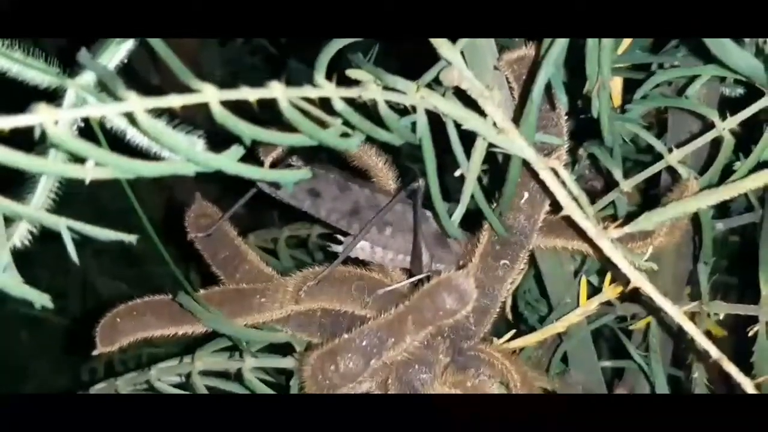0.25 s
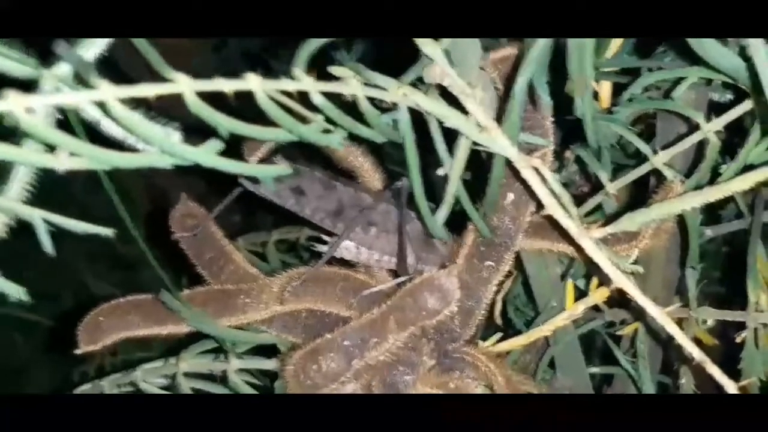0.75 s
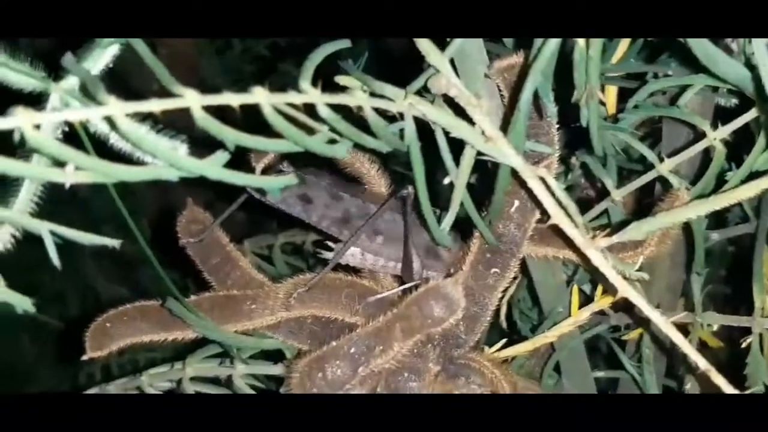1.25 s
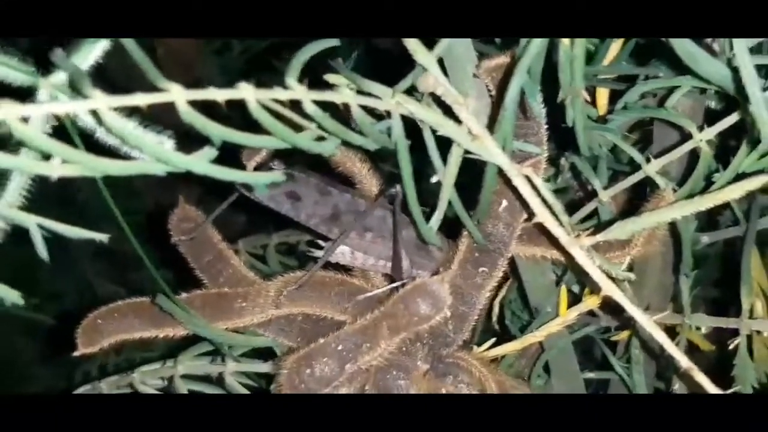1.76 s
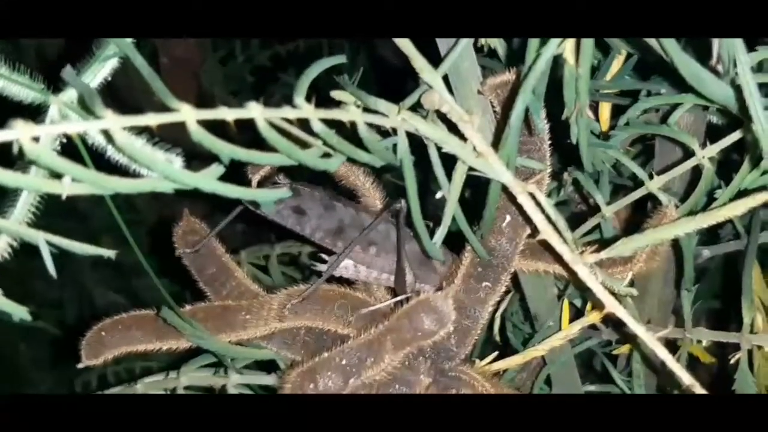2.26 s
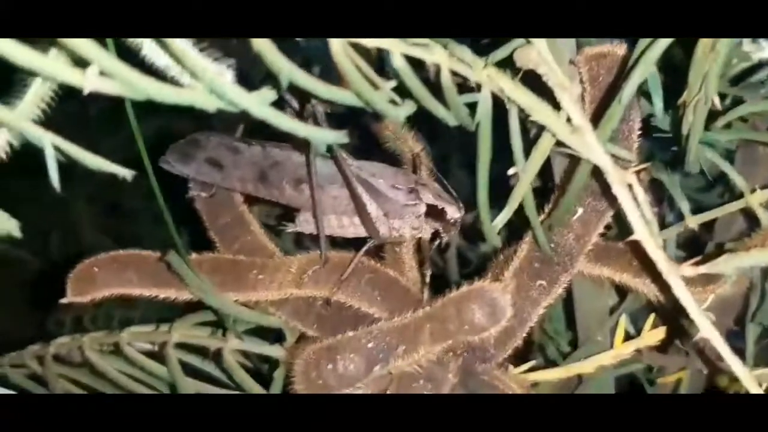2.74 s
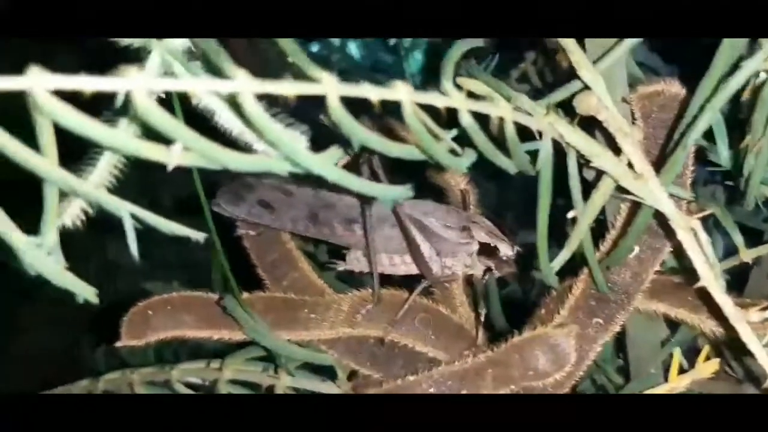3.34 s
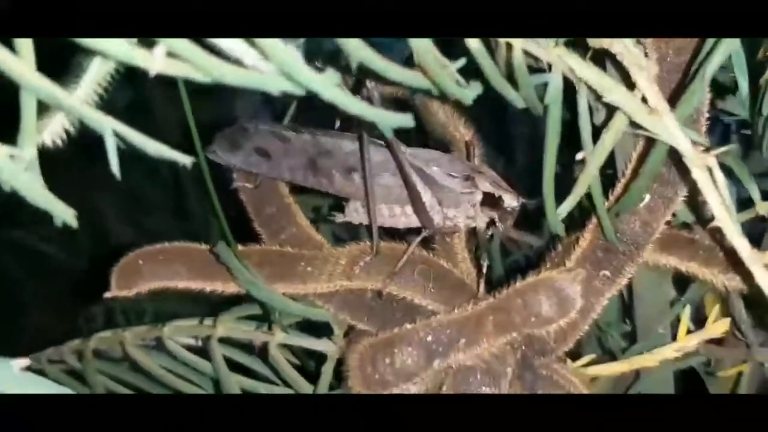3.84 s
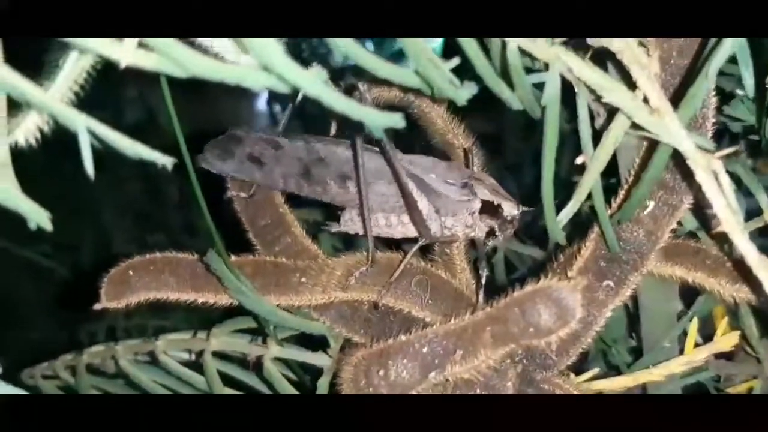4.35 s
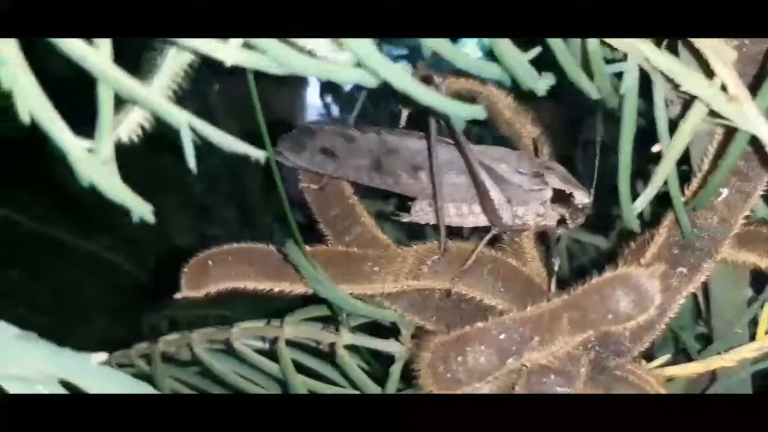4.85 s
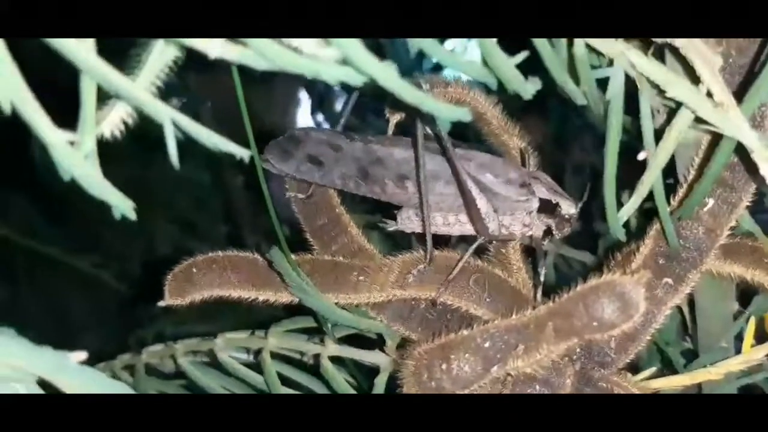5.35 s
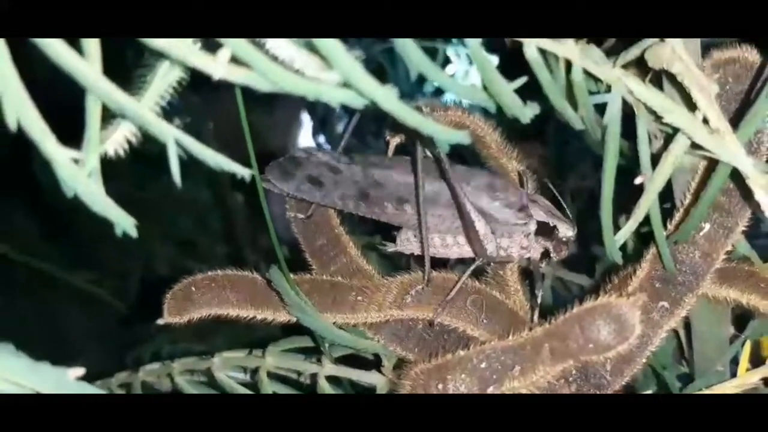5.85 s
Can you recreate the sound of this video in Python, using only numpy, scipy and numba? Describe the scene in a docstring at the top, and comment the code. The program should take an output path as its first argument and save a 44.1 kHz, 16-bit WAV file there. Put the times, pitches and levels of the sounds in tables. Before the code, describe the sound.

A close katydid rasps out loud, rapid chirps at night, stops briefly, then resumes weakly, over steady insect hiss and distant cricket trills.

```python
"""Night in the bushes: a steady hiss with crickets trilling further off, as noise and gliding sine notes.
Almost at once a katydid, close and slightly left of the phone's two microphones, calls some eight times a second;
each chirp, a soft opening and a loud closing stroke, drags a toothed file over a scraper and rings the wings.
Its strokes overload the microphones into a low thud; two more call from behind bushes; wing and foliage snap.
It pauses after 2.5 s, then resumes weakly with a slower tooth rate and hesitates twice before the end."""
import sys
import numpy as np
from scipy import signal
from scipy.fft import rfft, irfft
from scipy.io import wavfile
from numba import njit

SR = 44100
rng = np.random.default_rng(int(sys.argv[2]) if len(sys.argv) > 2 else 0)


def int16_out(signal):
    """Quantize to a 16-bit WAV file."""
    q = np.round(np.clip(np.atleast_2d(signal).T, -1, 1) * 32767)
    wavfile.write(sys.argv[1], SR, q.astype(np.int16))


N = 268965
TIME = np.arange(N) / SR
FREQ = np.fft.rfftfreq(N, 1 / SR)

# colour of the night air: [f/Hz, relative density level/dB]
NIGHT_COLOUR = [(30, -12), (190, -5.5), (450, -13.5), (1000, -18), (1950, -24), (2480, -8), (3000, -8),
                (3600, -10.5), (4150, -18), (5200, -11.5), (7700, -3), (9400, -13.5), (12300, -3.5),
                (15500, -12.5)]
# night hiss at the microphones; insects follow it: [t/s, level/dB before flicker]
NIGHT_LEVEL = [(0, -53), (2.4, -50.5), (2.7, -51), (4.3, -47), (5, -51), (6.1, -48.5)]
# bands of the farthest insects: [f/Hz, width/Hz of each of three passes, level/dB over the hiss]
CHORUS_BANDS = [(2547, 540, -11.5), (3600, 500, -10.5)]
# crickets further off: [first note t/s, notes per s, starting f/Hz, level/dB over the hiss before swell]
CRICKETS = [(.002, 16, 5760, -1.5), (0.041, 15, 4960, -10.5)]

# runs of close chirps; one long chirp ends the first bout, and the first after a hesitation is weaker:
# [start t/s, end t/s, period/s, first chirp's effort level/dB, first chirp's length/s]
RUNS = [(.0178, 2.42, .1179, 0, .031), (2.492, 2.55, .118, -.3, .04), (3.0035, 3.78, .1187, -7.5, .03),
        (3.851, 4.04, .126, -.7, .031), (4.0995, 5.57, .1172, 0, .03), (5.64, 6.05, .1171, -5, .015)]
CHIRP_S = .031  # every chirp but the first of a run
EFFORT_SCATTER_DB = .5
# teeth struck, slower after the pause: [t/s, tooth rate f/Hz]
TOOTH_RATE = [(2.4, 2621), (3.0, 2538), (6.0, 2556)]
# one wing cycle: [time as share of chirp length, force level/dB, tooth rate as multiple of the chirp's]
WING_CYCLE = [(0, -27, .88), (.09, -10, .91), (.22, -6, .98), (.35, -5, 1.05), (.39, -15, 1.0),
              (.49, -15, .92), (.58, -6, .95), (.8, 2, 1.0), (1.0, -3, 1.05), (1.06, -13, 1.02),
              (1.26, -14, 1.02), (1.38, -26, 1.0), (1.8, -46, 1.0)]
# wing resonances, low, main and treble, each rung in two passes of twice the listed width:
# [f as multiple of tooth rate, width/Hz, relative level/dB, phase lead at the left microphone/rad]
LOW_MODES = [(1.022, 700, 13.5, 2.26), (1.269, 464, -2.5, 3.13)]
MAIN_MODES = [(2.782, 687, -5.5, 3.92), (3.038, 850, 0, 5.08), (3.948, 1327, -11, 8.6)]
TREBLE_MODES = [(5.3, 1700, -2, 7.6), (5.85, 1500, 0, 7.7)]
# close song at the phone, at zero effort and before leaf tails:
# [t/s, main level/dB, low level/dB, treble level/dB, left minus right level/dB]
SONG_PLACE = [(0, -16, -26, -22, .9), (2.4, -15, -27, -22, 1.6), (3.1, -12, -24, -22, 1.5),
              (4.4, -15, -21.5, -22.5, 2.5), (6.0, -19.5, -22.5, -20.5, 2.5)]
# overload of the microphones at zero effort: [t/s, thud level/dB, swing level/dB]
OVERLOAD_LEVEL = [(0, -15.5, -26), (2.2, -15.5, -23.5), (2.55, -21.5, -44), (3.2, -21, -33),
                  (4.4, -23, -38.5), (5.2, -21.5, -34), (6.0, -29.5, -44)]
THUD_SLOPE, SWING_SLOPE = 4.2, 8.2  # dB per dB of effort: faster than the song
# colour of the thud, before a low-pass: [f/Hz, width/Hz, relative level/dB]
THUD_MODES = [(184, 90, -8.5), (330, 188, 0.5), (554, 300, -5.5), (762, 81, -3.5), (1635, 420, -11.5)]
# slow swing of the recovering microphones, before a further resonance: [f/Hz, width/Hz, relative level/dB]
SWING_MODES = [(62, 29, -4.5), (114.9, 49, -3.5)]
# dry snaps of wing and foliage: [t/s, level/dB at the peak of the envelope]
SNAPS = [(.355, -57.5), (0.471, -50), (1.504, -32), (2.615, -39.5), (3.704, -50), (4.462, -9.5)]
TOP_HZ = 15700  # upper edge of the phone's pass band


def undb(db):
    """Decibels to gain."""
    return 10 ** (np.asarray(db) / 20)


def unit(x):
    """Scale to rms 1."""
    return x / np.sqrt(np.mean(x ** 2))


def read(rows, times=TIME):
    """Join (t, value, ..) rows by straight lines; one curve for each column."""
    at, *columns = np.transpose(rows)
    return np.array([np.interp(times, at, column) for column in columns])


def walk(rate):
    """Random levels, rate a second, joined by straight lines."""
    return np.interp(TIME * rate, np.arange(N // 20), rng.standard_normal(N // 20))


def shape(x, response):
    """Filter by a frequency response."""
    return irfft(rfft(x) * response, N)


def resonance(hz, width_hz):
    """Response of one resonance, gain 1 at its centre."""
    return 1j * FREQ * width_hz / (hz ** 2 - FREQ ** 2 + 1j * FREQ * width_hz)


def resonances(modes):
    """Summed response of (f, width, level) resonances."""
    return sum(undb(db) * resonance(hz, width_hz) for hz, width_hz, db in modes)


def lowpass(hz, order):
    """Response of a smooth low-pass."""
    return signal.freqs(*signal.butter(order, 1, analog=True), FREQ / hz)[1]


def leaves(x, t60, db, size=4096):
    """Twigs and leaves scatter a short tail, different at each microphone and changing as the phone sways."""
    out = np.zeros((2, N + 2 * size))
    fade = undb(-60 * TIME[:size] / t60)
    fade /= np.sqrt(np.sum(fade ** 2))
    window = np.sqrt(np.hanning(size))
    # half-overlapping pieces, each with a newly drawn tail
    for i in range(0, N, size // 2):
        piece = x[i:i + size] * window[:N - i]
        tail = rng.standard_normal((2, size)) * fade
        wet = signal.fftconvolve(piece[None], tail, axes=1)
        out[:, i:i + wet.shape[1]] += wet
    return undb(db) * out[:, :N]


def night(flicker_db=.5):
    """A softly flickering hiss of air and countless insects; its bass is more alike on both sides."""
    hz, db = np.transpose(NIGHT_COLOUR)
    colour = undb(np.interp(np.log(FREQ + 1), np.log(hz), db))
    mid, side = shape(rng.standard_normal((2, N)), colour)
    side = shape(side, np.interp(FREQ, [300, 1500, 8000], [.5, 1, .75]))
    hiss = unit(np.array([mid + side, mid - side]))
    return hiss * undb(flicker_db * walk(20))


def shimmer(flicker_db=4, flickers_per_s=70):
    """The farthest insects blur into narrow noise bands that flicker each on its own."""
    out = 0
    for hz, width_hz, db in CHORUS_BANDS:
        flickering = rng.standard_normal((2, N)) * undb(flicker_db * walk(flickers_per_s))
        out = out + undb(db) * unit(shape(flickering, resonance(hz, width_hz) ** 3))
    return out


def cricket(first, rate_hz, hz, db, length=.042, sag=.1, scatter_db=1.6, waver_db=2.5):
    """A trill of nearly pure notes, each swelling, dipping and returning as its pitch sags."""
    out = np.zeros(N + SR)
    age = np.arange(int(length * SR)) / int(length * SR)  # share of the note
    swell = np.interp(age, [0, .27, .55, 1], [0.54, 0.94, 0.0, 0.63])
    glide = 1 - sag * age ** 1.4
    starts = np.arange(first, N / SR, 1 / rate_hz)
    for start, (late, pitch, loud) in zip(starts, rng.standard_normal((200, 3))):
        i = int(abs(start + .003 * late) * SR)
        turns = np.cumsum(hz * (1 + .008 * pitch) * glide) / SR
        note = np.sqrt(2) * swell * np.sin(2 * np.pi * turns)
        out[i:i + len(age)] += undb(db + scatter_db * loud) * note
    trill = out[:N] * undb(waver_db * walk(2))
    return trill + leaves(trill, t60=.03, db=-3)


def chirps():
    """Start, length, tooth rate and effort of every close chirp in the runs."""
    rows = []
    for start, end, period, first_db, first_s in RUNS:
        for t in np.arange(start, end, period):
            rows.append((t, first_s, first_db) if t == start else (t, CHIRP_S, 0))
    starts, lengths, effort_db = np.transpose(rows)
    effort_db = effort_db + EFFORT_SCATTER_DB * rng.standard_normal(len(starts))
    return starts, lengths, read(TOOTH_RATE, starts)[0], effort_db


def strokes(starts, lengths, rates_hz):
    """Force on the file and tooth rate through a train of wing cycles."""
    which = np.clip(np.searchsorted(starts, TIME) - 1, 0, len(starts) - 1)
    age = (TIME - starts[which]) / lengths[which]
    share, force_db, speed = np.transpose(WING_CYCLE)
    force = undb(np.interp(age, share, force_db)) * (age > 0) * (age < share[-1])
    return force, rates_hz[which] * np.interp(age, share, speed)


def teeth(force, rate_hz, jitter, uneven_db):
    """One click for each tooth that slips past the scraper, uneven in spacing and size."""
    turns = np.cumsum(rate_hz) / SR
    count = np.arange(int(turns[-1]))
    chance = rng.standard_normal((N // 8, 2))[:len(count)]
    # spacing errors add up from tooth to tooth
    at = np.interp(count + jitter * np.cumsum(chance[:, 0]), turns, np.arange(N))
    size = force[at.astype(int)] * undb(uneven_db * chance[:, 1])
    # windowed sinc clicks fall between samples
    taps = at.astype(int)[:, None] + np.arange(-7, 9)
    offset = taps - at[:, None]
    clicks = size[:, None] * np.sinc(offset) * np.sinc(offset / 8)
    return np.bincount(np.clip(taps, 0, N - 1).ravel(), clicks.ravel(), N)


@njit
def resonate(x, hz, width_hz):
    """State-variable band-pass whose centre may move every sample."""
    y, band, low = np.empty(len(x)), 0., 0.
    for i in range(len(x)):
        g, k = np.tan(np.pi * min(hz[i] / SR, .45)), width_hz / hz[i]
        v = (band + g * (x[i] - low)) / (1 + g * (g + k))
        band, low, y[i] = 2 * v - band, low + 2 * g * v, k * v
    return y


def ring(x, rate_hz, modes):
    """Wing resonances follow the tooth rate; each reaches the two microphones with its own phase."""
    out = 0
    for multiple, width_hz, db, lead in modes:
        once = resonate(x, multiple * rate_hz, 2. * width_hz)
        mode = undb(db) * resonate(once, multiple * rate_hz, 2. * width_hz)
        out = out + np.array([mode, shape(mode, np.exp(-1j * lead))])
    return out


def each_at(x, starts, lengths, levels_db):
    """Give every chirp in x its own level, its energy taken as rms over its length."""
    which = np.clip(np.searchsorted(starts - .005, TIME) - 1, 0, len(starts) - 1)
    power = np.bincount(which, np.mean(np.atleast_2d(x) ** 2, axis=0)) / (lengths * SR)
    return x * (undb(levels_db) / np.sqrt(power + 1e-18))[which]


def katydid(starts, lengths, rates_hz, effort_db, rasp_db=-13, crackle_db=-7, near_db=-7, far_db=-34, grit=0.48):
    """Tooth clicks ring the wings, whose main resonance lies near the third multiple of the tooth rate."""
    main_db, low_db, treble_db = read(SONG_PLACE, starts)[:3] + effort_db
    thud_db = read(OVERLOAD_LEVEL, starts)[0] + THUD_SLOPE * effort_db
    force, rate_hz = strokes(starts, lengths, rates_hz)
    # the scraper catches and skips, so no two strokes are alike
    force = force * undb(2 * walk(600))
    rate_hz = rate_hz * np.exp(.018 * walk(500))
    clicks = teeth(force, rate_hz, jitter=.066, uneven_db=3.5)

    # a harder stroke is brighter: the low resonance saturates first
    scrape = clicks + grit * force * rng.standard_normal(N)
    low = ring(scrape / (force + 0.25) ** 0.33, rate_hz, LOW_MODES)
    main = ring(clicks, rate_hz, MAIN_MODES)
    treble = ring(clicks * force ** .15, rate_hz, TREBLE_MODES)
    song = (each_at(low, starts, lengths, low_db)
            + each_at(main, starts, lengths, main_db)
            + each_at(treble, starts, lengths, treble_db))

    # the scraper also grates without a pitch; the overloaded microphones add a broad crackle
    grating = shape(rng.standard_normal((2, N)) * force ** .75, resonance(10500, 8000) ** 3)
    crackle_colour = lowpass(9000, order=1) * (1 - .95 * resonance(4600, 2600))
    crackle = shape(rng.standard_normal((2, N)) * force ** 1.5, crackle_colour)
    rasp = (each_at(grating, starts, lengths, main_db + rasp_db)
            + each_at(crackle, starts, lengths, thud_db + crackle_db))
    near = leaves(song[0], t60=.012, db=near_db)
    far = leaves(song[0], t60=0.088, db=far_db)
    return song + rasp + near + far


def overload(starts, lengths, rates_hz, effort_db, steepness=2.9, shared=0.98, lag_s=0.0017):
    """The song's ultrasound beats in the overloaded microphones: a rough thud, then a slow recovery swing."""
    slopes = [THUD_SLOPE, SWING_SLOPE]
    thud_db, swing_db = read(OVERLOAD_LEVEL, starts) + np.outer(slopes, effort_db)
    force = strokes(starts + lag_s, lengths, rates_hz)[0]
    drive = force ** steepness * undb(3.0 * walk(400))
    # noise of each microphone plus noise common to both
    beats = drive * (rng.standard_normal((2, N)) + shared * rng.standard_normal(N))
    thud = shape(beats, resonances(THUD_MODES) * lowpass(940, order=2))
    # the deepest part of the swing comes last
    push = drive + 3 * beats
    swing = shape(push, resonances(SWING_MODES) * resonance(99.6, 89) ** 2)
    return each_at(thud, starts, lengths, thud_db) + each_at(swing, starts, lengths, swing_db)


def far_katydid(first, rate_hz, tooth_hz, low_db, db):
    """Another katydid, only its scattered tail arriving through the bushes in between."""
    starts = first + (np.arange(64) + .03 * rng.standard_normal(64)) / rate_hz
    lengths, rates_hz = np.full(len(starts), .032), np.full(len(starts), tooth_hz)
    force, speed = strokes(starts, lengths, rates_hz)
    clicks = teeth(force, speed, jitter=.04, uneven_db=3)
    song = ring(clicks, speed, [(1, 380, low_db, 0), (3, 700, 0, 0)])[0]
    return leaves(unit(song), t60=.03, db=db)


def snaps(decay=0.0015):
    """Dry snaps of wing and foliage, most tiny, one loud: noise bursts that rise and fall over decay seconds."""
    force = sum(undb(db) * np.exp(-np.abs(TIME - start) / decay) for start, db in SNAPS)
    colour = resonance(7300, 2900) + 0.9 * resonance(700, 1140)
    return force * unit(shape(rng.standard_normal((2, N)), colour))


def scene():
    """The near katydid, a little to the left, in front of the night."""
    song = chirps()
    pan = undb(np.array([[.5], [-.5]]) * read(SONG_PLACE)[-1])
    far = (far_katydid(.095, 8.3, 2500, low_db=-4, db=-52)
           + far_katydid(.035, 7.55, 2700, low_db=-12, db=-55.5))
    crickets = sum(cricket(*row) for row in CRICKETS)
    chorus = (night() + shimmer() + crickets) * undb(read(NIGHT_LEVEL)[0])
    close = pan * (katydid(*song) + overload(*song))
    return close + far + chorus + snaps()


def record(dry, ceiling=1.15):
    """The phone rounds off the highest peaks and cuts the top."""
    rounded = dry / (1 + (dry / ceiling) ** 4) ** (1 / 4)
    top_cut = signal.ellip(10, .2, 60, TOP_HZ, fs=SR, output="sos")  # .2 dB ripple, 60 dB stop band
    return signal.sosfilt(top_cut, rounded)


dry = scene()
out = record(dry)
int16_out(out)
```